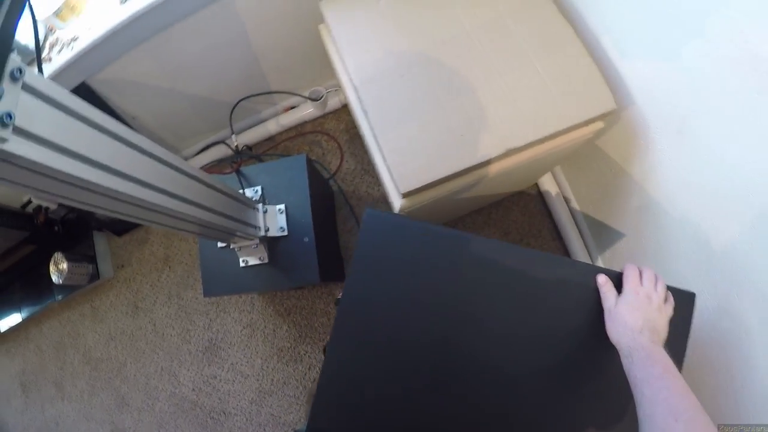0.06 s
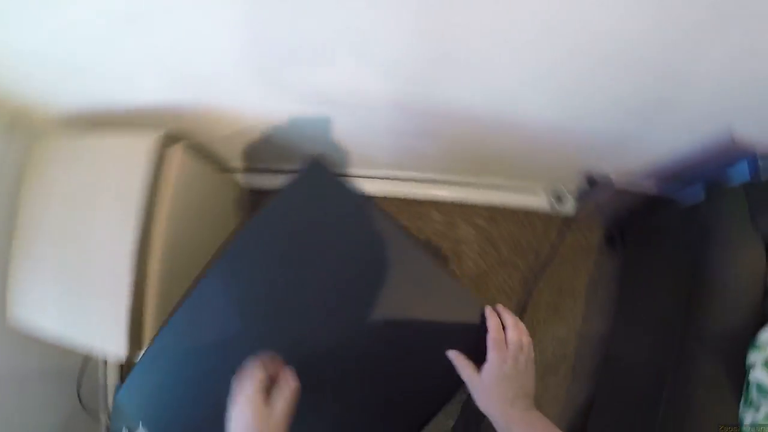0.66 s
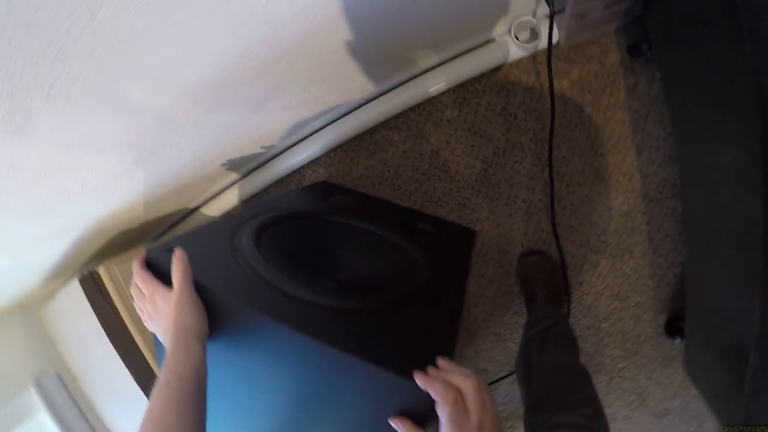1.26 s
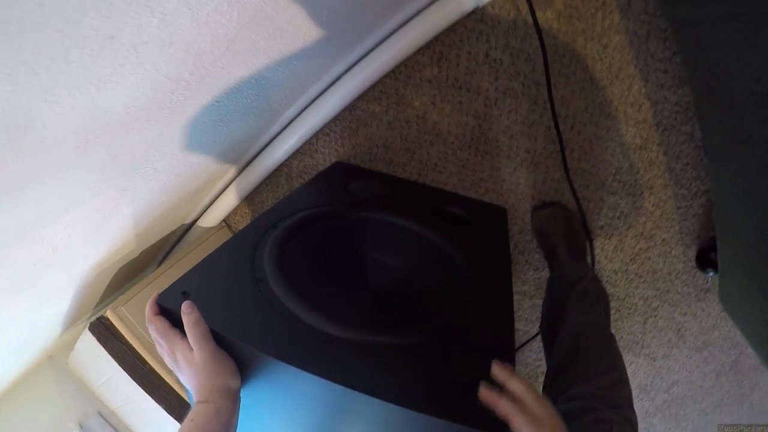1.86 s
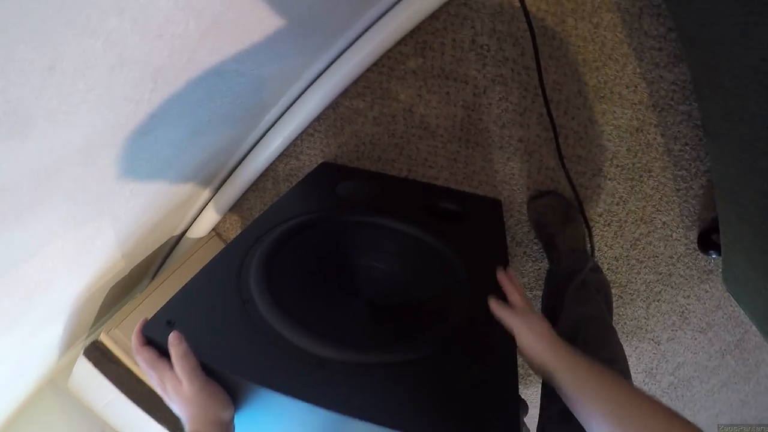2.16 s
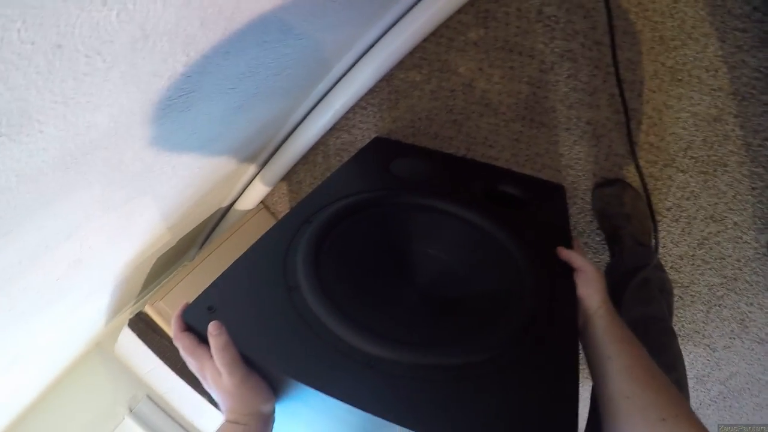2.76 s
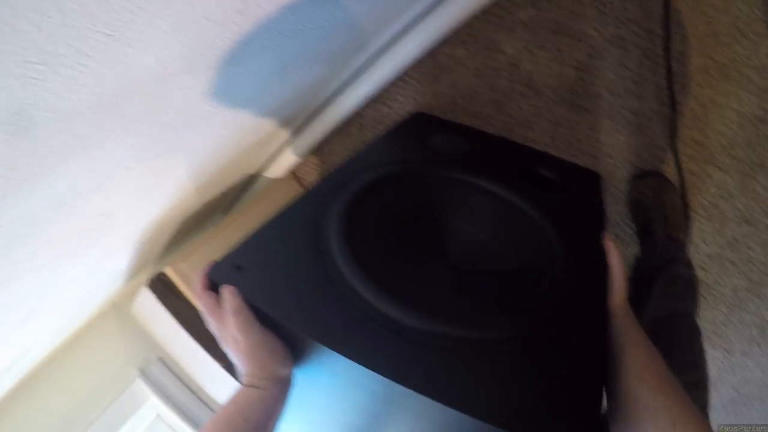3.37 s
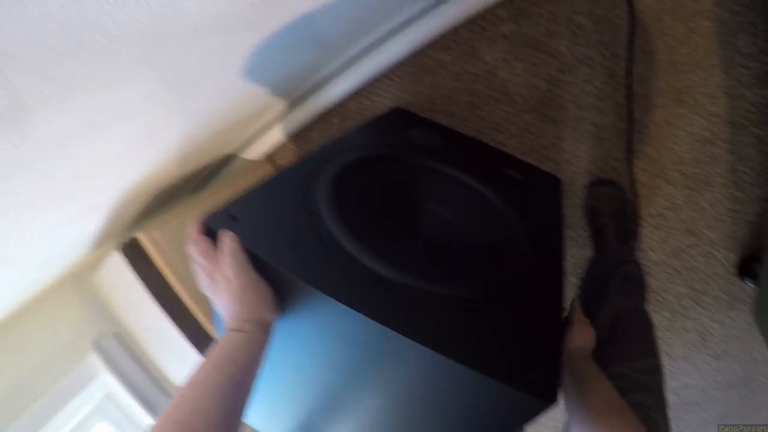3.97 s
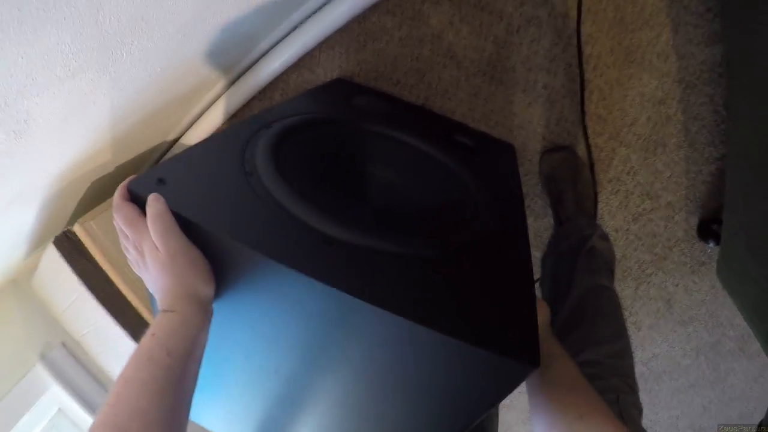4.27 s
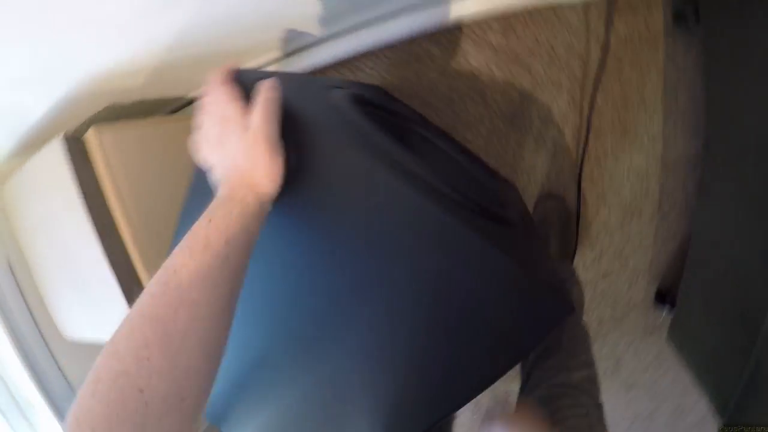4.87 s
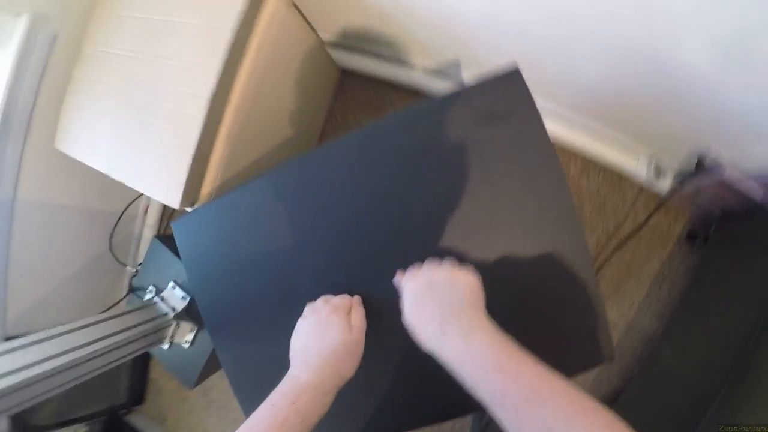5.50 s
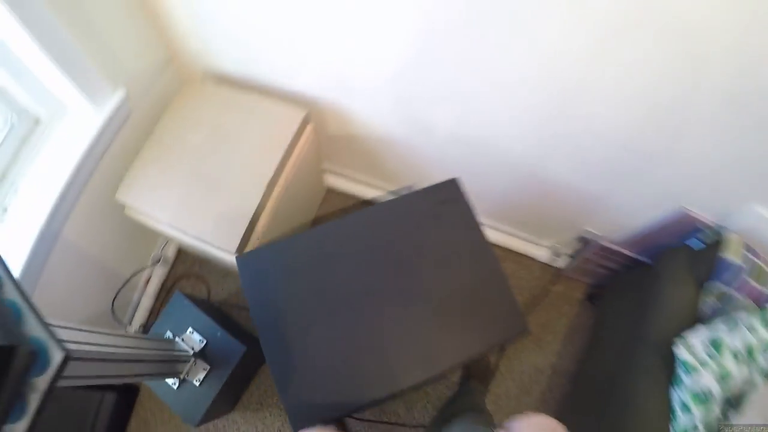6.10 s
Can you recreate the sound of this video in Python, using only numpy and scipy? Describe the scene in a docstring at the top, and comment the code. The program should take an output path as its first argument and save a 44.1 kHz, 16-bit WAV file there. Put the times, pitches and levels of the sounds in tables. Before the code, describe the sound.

A faint fan hum fills a small carpeted room while a heavy speaker box is shifted close to the microphone, with light brushing and a couple of muffled bumps. Then come nine loud knuckle knocks in three even groups of three: the first group deeper, the next two higher and woodier, each briefly ringing off nearby walls. The box rocks back with a soft rumble and a cluster of low thumps.

```python
"""In a small carpeted room, a subwoofer box is tipped over and rapped with a knuckle,
three times on each of three faces. Each rap bends a panel and sets the box ringing,
and the near walls throw the sound back at the listener. Hands slide over the box, and it
rumbles as it is rocked upright. Soft low thumps come and go over a faint hum and fan noise."""
import sys
import numpy as np
from scipy import signal
from scipy.fft import rfft, irfft
from scipy.io import wavfile

SR = 44100
rng = np.random.default_rng(int(sys.argv[2]) if len(sys.argv) > 2 else 0)


def store_pcm(level_fs):
    """Save levels as 16-bit WAV."""
    pcm = np.round(np.clip(level_fs, -1, 1) * 32767).astype(np.int16)
    wavfile.write(sys.argv[1], SR, np.atleast_2d(pcm).T)


N = 270818
T = np.arange(N) / SR
HIT_SAMPLES = 32768  # long enough for one hit to die away
HIT_T = np.arange(HIT_SAMPLES) / SR
HIT_HZ = np.arange(HIT_SAMPLES // 2 + 1) * SR / HIT_SAMPLES
LEFT_LAG_MS = 0.36  # sound from the box reaches the left ear this much later


def gain(db):
    """Turn decibels into a number to multiply by."""
    return 10 ** (np.asarray(db) / 20)


def pan(db):
    """Left and right gains, with the left louder by db."""
    return gain(db * np.array([[.5], [-.5]]))


def curve(points, size):
    """Join (hz, value) points into one value for each frequency of a spectrum."""
    hz, value = np.transpose(points)
    return np.interp(np.log(np.arange(size // 2 + 1) * SR / size + 1), np.log(hz), value)


def two_ear_spectra(size, alike_hz):
    """Noise spectra at both ears: the same in the bass, unrelated in the treble."""
    mid, side = rfft(rng.standard_normal((2, size)))
    alike = 1 / (1 + (np.arange(len(mid)) * SR / size / alike_hz) ** 2)
    return (mid * np.sqrt(1 + alike) + np.array([[1], [-1]]) * side * np.sqrt(1 - alike)) / np.sqrt(2)


def noise(colour, size=N, alike_hz=420):
    """Stereo noise of strength 1, shaped by a table of (hz, db) points."""
    x = irfft(two_ear_spectra(size, alike_hz) * gain(curve(colour, size)), size)
    return x / x.std()


def wander(rate_hz):
    """A slow random drift, mostly between -1 and 1."""
    return np.interp(T * rate_hz, np.arange(1024), rng.standard_normal(1024))


def fade(fade_s):
    """A level that falls by 60 dB every fade_s seconds."""
    return np.exp(-np.log(1000) * HIT_T / fade_s)


def struck(colour):
    """Spectrum of a struck object: its energy comes as early as it can (minimum phase)."""
    cepstrum = irfft(np.log(gain(curve(colour, HIT_SAMPLES))))
    cepstrum[1:HIT_SAMPLES // 2] *= 2
    cepstrum[HIT_SAMPLES // 2 + 1:] = 0
    return np.exp(rfft(cepstrum))


def movement(start_s, rise_s, hold_s, fall_s):
    """Speed of one movement, from 0 to 1: it gathers, holds and comes to rest."""
    corners = start_s + np.cumsum([0, rise_s, hold_s, fall_s])
    return np.sin(np.pi / 2 * np.interp(T, corners, [0, 1, 1, 0]))


def add(out, sound, start_s):
    """Mix a stereo sound into out."""
    start = max(int(start_s * SR), 0)
    out[:, start:start + sound.shape[1]] += sound[:, :max(N - start, 0)]


# The fan's rush, from bass to treble: frequency_hz, level_db
FAN_COLOUR = [(20, 1.5), (45, -10), (80, -13.5), (102, -12), (145, -9), (180, -14.5), (380, -11),
              (680, -17.5), (770, -14.5), (900, -15.5), (1080, -25.5), (1700, -24), (2300, -32.5),
              (7500, -38.5), (15000, -40.5)]
# Tones from the mains power and the fan: pitch_hz, level_db
HUM_TONES = [(120, -62.5), (343, -76), (749, -72)]

def fan_and_hum(fan_db=-56, swell_db=.5, waver_db=1.6, drift_rad=0.18):
    """A fan rushes softly behind a few wavering tones."""
    air = noise(FAN_COLOUR) * gain(fan_db + swell_db * wander(9.2))
    hum = 0
    for hz, db in HUM_TONES:
        level = np.sqrt(2) * gain(db + waver_db * wander(6))
        hum += level * np.sin(2 * np.pi * hz * T + drift_rad * wander(4))
    return air + hum


# A dark, pressed rub and a bright, light brush: frequency_hz, level_db
RUB_COLOUR = [(300, -4.5), (800, 4.5), (1600, -4.5), (2700, -5), (4000, -12), (7000, -15), (15000, -27)]
BRUSH_COLOUR = [(1000, -4.5), (4000, -11.5), (7500, -6.5), (11000, -12.5), (15000, -11)]
# Strokes of skin and cloth over the box: start_s, speed_up_s, slow_down_s, rub_db, brush_db
HAND_STROKES = [(0, 0.0057, .08, -58.5, -80), (.12, .08, .2, -71, -73), (.51, 0.039, .12, -63, -65),
                (.84, 0.044, .3, -72, -69), (1.0, 0.4, .22, -55.5, -68), (1.7, .22, .22, -72, -68),
                (2.12, .11, 0.39, -69.5, -65.5), (3.52, .1, .33, -69.5, -69.5),
                (4.78, 0.027, 0.053, -64, -66.5), (4.87, .04, .12, -78, -70), (5.72, .08, .15, -70, -63.5),
                (5.9, 0.029, 0.042, -56, -76), (5.93, 0.11, 0.16, -69, -65.5)]

def sliding_hands(uneven_db=1.46, speed_power=1.14):
    """Hands slide unevenly over the panels, louder the faster they move."""
    rub, brush = 0, 0
    for start_s, speed_up_s, slow_down_s, rub_db, brush_db in HAND_STROKES:
        friction = movement(start_s, speed_up_s, 0, slow_down_s) ** speed_power
        rub += gain(rub_db) * friction
        brush += gain(brush_db) * friction
    return (noise(RUB_COLOUR) * rub + noise(BRUSH_COLOUR) * brush) * gain(uneven_db * wander(45))


# The deep rumble: frequency_hz, level_db
RUMBLE_SHAPE = [(15, -27), (27, 0), (36, 3), (46, -17.5), (80, -18), (160, -50.5), (600, -81.5)]

def rumble(steady_db=-65.5, rocking_db=-46.5):
    """A faint, steady rumble swells once as the heavy box is rocked upright."""
    rocking = movement(start_s=4.486, rise_s=1.17, hold_s=0.21, fall_s=.24) ** 2
    return noise(RUMBLE_SHAPE, alike_hz=50) * (gain(steady_db) + gain(rocking_db) * rocking)


# The light tap that starts a thump, and the scuff after it: frequency_hz, level_db
TAP_COLOUR = [(80, -15), (300, 0.5), (720, -3.5), (1100, -9.5), (2700, -28.5), (5000, -40), (15000, -42)]
SCUFF_COLOUR = [(80, 0.5), (200, 19), (400, 5.5), (700, -1), (1200, -30), (3000, -38), (6000, -62.5),
                (15000, -61.5)]
# Soft low thumps: start_s, level_db, start_pitch_hz, scuff_vs_thud_db, tap_db
SOFT_BUMPS = [(.367, -47.5, 184, -1.5, -0.5), (.972, -45, 185, -5.5, -9.5), (2.375, -71, 149, -10, -17),
              (4.908, -39, 198, -6.5, -3.5), (5.275, -44.5, 135, -4.5, 9.5), (5.802, -46, 185, -5.5, -6),
              (5.947, -42, 183, -9, -11), (6.004, -46.5, 190, -5.5, -13), (6.041, -38, 212.4, -9.5, -9),
              (6.102, -34.5, 216, -10, 1.5)]

def soft_bumps(rise_s=0.0075, thud_s=0.086, scuff_s=0.24, glide=0.46, glide_s=0.026):
    """Soft low thumps, each a light tap, a short scuff and a dull thud rising in pitch."""
    out = np.zeros((2, N))
    onset = 1 - np.exp(-(HIT_T / rise_s) ** 2)
    tap = irfft(struck(TAP_COLOUR) * room("side"))
    for start_s, db, start_hz, scuff_db, tap_db in SOFT_BUMPS:
        pitch_hz = start_hz * (1 + glide * (1 - np.exp(-HIT_T / glide_s)))
        thud = np.sin(2 * np.pi * np.cumsum(pitch_hz) / SR) * fade(thud_s)
        scuff = gain(scuff_db) * noise(SCUFF_COLOUR, HIT_SAMPLES) * fade(scuff_s)
        add(out, 2 * gain(db) * onset * (thud + scuff) + gain(tap_db) * tap, start_s)
    return out


# Paths from each face to the listener: straight_db, wall_delay_ms, wall_db
FACE_PATHS = {"baffle": (0, 9.5, 0), "side": (1.9, 7.9, 0.67), "top": (-7, 14, 1.9)}
# First echoes off the floor and furniture: delay_ms, level_db, left_lag_ms
EARLY_ECHOES = [(3.922, 2, 0.287), (7.74, -7, 0.31), (14.51, -7, -0.27), (17.53, -3.5, 0.27),
                (21.22, -7.5, 0.33)]
# How long the room takes to fade by 60 dB: frequency_hz, fade_s
ROOM_FADES = [(100, 0.39), (400, 0.44), (1100, 0.39), (3000, 0.37), (8000, 0.29), (15000, 0.25)]

def room(face, build_s=0.0026, tail_db=7.5, scatter_db=8, scatter_s=0.17):
    """The room as a filter: a straight path, first echoes, scattered sound and a tail that dulls."""
    straight_db, wall_ms, wall_db = FACE_PATHS[face]
    paths = [(0, straight_db, LEFT_LAG_MS), (wall_ms, wall_db, LEFT_LAG_MS)] + EARLY_ECHOES
    response, tail = 0, 0
    for delay_ms, db, lag_ms in paths:
        ear_delays_s = np.array([[delay_ms + lag_ms], [delay_ms]]) / 1000
        response += gain(db) * np.exp(-2j * np.pi * HIT_HZ * ear_delays_s)
    wash = two_ear_spectra(HIT_SAMPLES, alike_hz=300)
    for band_hz, fade_s in ROOM_FADES:
        band = curve([(hz, float(hz == band_hz)) for hz, _ in ROOM_FADES], HIT_SAMPLES)
        tail += irfft(wash * band) * fade(fade_s)
    scatter = irfft(two_ear_spectra(HIT_SAMPLES, alike_hz=296)) * fade(scatter_s)
    onset = 1 - np.exp(-HIT_T / build_s)
    for part, db in ((tail * onset, tail_db), (scatter * onset, scatter_db)):
        response += gain(db) * rfft(part) / np.sqrt(np.sum(part ** 2) / 2)
    return response / np.sqrt(np.mean(np.abs(response) ** 2))  # average power becomes 1


# The faces that are rapped; the baffle is the one that holds the speaker: face_name
BOX_FACES = ["baffle", "side", "top"]
# Notes of the box and the air around it, by face struck: pitch_hz, baffle_db, side_db, top_db
BOX_NOTES = [(64.5, -36.5, -40.5, -40), (125, -19.5, -23.5, -35), (169, -28, -39.5, -49),
             (195.3, -40, -59, -47), (308, -24.5, -39.5, -52), (332.2, -18.5, -35.5, -35),
             (392, -29, -26.5, -29.5), (420, -43, -37, -34), (481, -38, -33, -35), (530, -34.5, -26.5, -26),
             (538, -39, -26, -32), (597, -36.5, -35.5, -42), (641, -57, -40, -25),
             (694.5, -36.5, -24.5, -24.5), (749, -30, -23.5, -48), (807.5, -50, -32, -38),
             (847, -41, -39, -34), (930, -40, -45, -58), (1033, -56, -29, -55), (1236, -30, -36.5, -26.5),
             (1290, -45, -32.5, -44), (1330, -47, -38, -44), (1450, -54, -36, -49), (1560, -44, -44, -48),
             (1840, -56, -38, -31), (2860, -62, -43, -55)]
# How long those notes take to fade by 60 dB: pitch_hz, fade_s
NOTE_FADES = [(70, .3), (122, .19), (170, .28), (340, .35), (700, .33), (1400, .25), (3000, .17)]

def box_ring(face, build_s=0.005, spread_hz=280, vary_db=1.0):
    """The box's own notes swell quickly and die away; higher ones reach the ears out of step."""
    out = 0
    chances = rng.standard_normal((len(BOX_NOTES), 3))
    for (hz, *face_dbs), (softer, phase, skew) in zip(BOX_NOTES, chances):
        level = gain(face_dbs[BOX_FACES.index(face)] - vary_db * softer)
        fade_s = np.interp(hz, *np.transpose(NOTE_FADES))
        left_lag_rad = 2 * np.pi * hz * LEFT_LAG_MS / 1000 + skew * min(hz / spread_hz, 1) / 2
        angle = 2 * np.pi * hz * HIT_T + np.pi * phase - np.array([[left_lag_rad], [0]])
        out += level * fade(fade_s) * np.sin(angle)
    return out * (1 - np.exp(-HIT_T / build_s))


def spot_boost(spot_hz, spot_db, sharpness=4):
    """Each spot on a panel favours its own pitch: a filter that lifts that band."""
    off_pitch = HIT_HZ / spot_hz - spot_hz / (HIT_HZ + 1e-9)
    return 1 + (gain(spot_db) - 1) / (1 + 1j * sharpness * off_pitch)


def hollow_tock(spot_hz, spot_db, lift_db=6.5, swell_s=.014, order=5):
    """Spectrum of the struck spot's short note, which swells, fades and goes straight to the ears."""
    level = gain(lift_db) * (gain(spot_db) - 1)
    note = (1 + 2j * np.pi * (HIT_HZ - spot_hz) * swell_s / (order - 1)) ** -order
    ear_delays_s = np.array([[LEFT_LAG_MS], [0]]) / 1000
    return level * note * np.exp(-2j * np.pi * HIT_HZ * ear_delays_s)


def knuckle_push(cutoff_hz):
    """Spectrum of the push: even up to cutoff_hz, then falling. A shorter contact is brighter."""
    return signal.freqs(*signal.butter(4, 1, analog=True), HIT_HZ / cutoff_hz)[1]


# The quickly fading sound of each face bending: frequency_hz, level_db
PANEL_COLOURS = { "baffle": [(40, -16), (90, 15.5), (140, 24.5), (250, 19), (340, 26), (500, 18),
                 (1000, 17.5), (1800, 10), (2600, 7.5), (3200, 4), (3800, 7), (6000, -12), (15000, -14)],
                 "side": [(40, 4.5), (90, 18.5), (220, 3.5), (320, 19.5), (520, 28.5), (740, 28),
                 (1100, 19.5), (1400, 25), (2000, 12.5), (3000, 4), (4000, -3), (15000, 2)],
                 "top": [(40, 10), (90, 16), (220, 0.5), (310, 17.5), (420, 27), (850, 23.5), (1150, 18),
                 (1500, 19.5), (2200, 10), (3000, 4), (4000, -10.5), (15000, -4)]}
# The tick of the knuckle bone: frequency_hz, level_db
TICK_COLOUR = [(500, -33), (2500, -4), (4500, -6.5), (7000, -2.5), (10000, -9), (15000, -17.5)]
# The nine raps: start_s, face_name, panel_db, ring_db, cutoff_hz, tick_db, spot_hz, spot_db, pan_db
RAPS = [(2.9008, "baffle", -12, -14.5, 3400, -11, 712, 7.5, -0.5),
        (3.1182, "baffle", -1, -1, 4030, 3, 3570, 3.5, -1),
        (3.3356, "baffle", 1.5, -0.5, 4830, -1, 2580, 4.5, 0),
        (4.1259, "side", -0.5, -1, 2050, -17, 720, 5.5, -1.5),
        (4.367, "side", 0, -2, 3060, -14, 980, 4.5, -1.5),
        (4.6122, "side", -1, 0.5, 2420, -18.5, 970, 5, -1.5),
        (5.2177, "top", -5.5, -4, 2040, -16.5, 1650, 1, -2.4),
        (5.445, "top", -2.5, -3.5, 3370, -13, 785, 7, -2),
        (5.6865, "top", -5, -4.5, 2680, -10, 862, 10.5, -2.5)]

def knuckle_raps():
    """Flesh bends the panel and rings the box, bone adds a tick, and the spot answers with a tock."""
    out = np.zeros((2, N))
    rooms = {face: room(face) for face in BOX_FACES}
    for start_s, face, panel_db, ring_db, cutoff_hz, tick_db, spot_hz, spot_db, pan_db in RAPS:
        panel = gain(panel_db) * struck(PANEL_COLOURS[face])
        ring = gain(ring_db) * rfft(box_ring(face))
        body = (panel * rooms[face] + ring) * spot_boost(spot_hz, spot_db)
        tock = panel * hollow_tock(spot_hz, spot_db)
        tick = gain(tick_db) * struck(TICK_COLOUR) * rooms[face]
        rap = (body + tock) * knuckle_push(cutoff_hz) + tick
        add(out, pan(pan_db) * irfft(rap), start_s)
    return out


def scene(soft_pan_db=-1, fan_pan_db=2):
    """Thumps, sliding hands and rumble sit a little to the right; the fan stands to the left."""
    raps = knuckle_raps()
    soft_sounds = soft_bumps() + sliding_hands() + rumble()
    return raps + soft_sounds * pan(soft_pan_db) + fan_and_hum() * pan(fan_pan_db)


def record(dry, top_hz=15900):
    """Cut away the very highest treble."""
    return signal.sosfilt(signal.ellip(10, .2, 80, top_hz, fs=SR, output="sos"), dry)


dry = scene()
out = record(dry)
store_pcm(out)
```